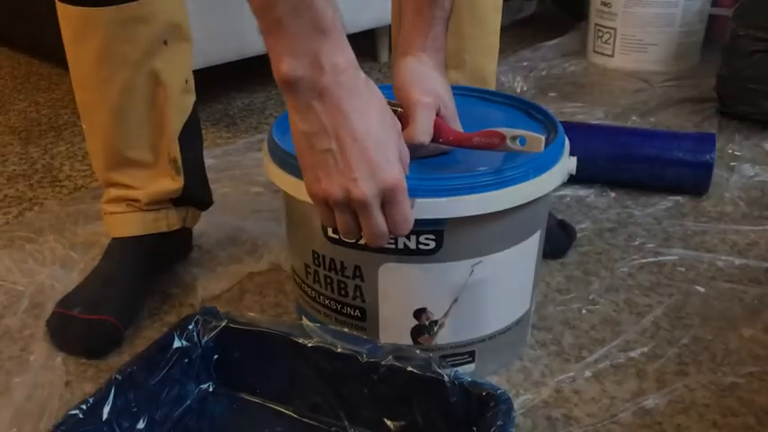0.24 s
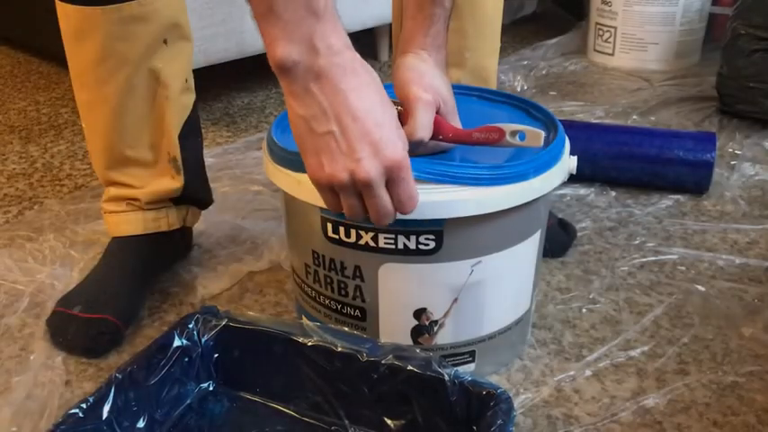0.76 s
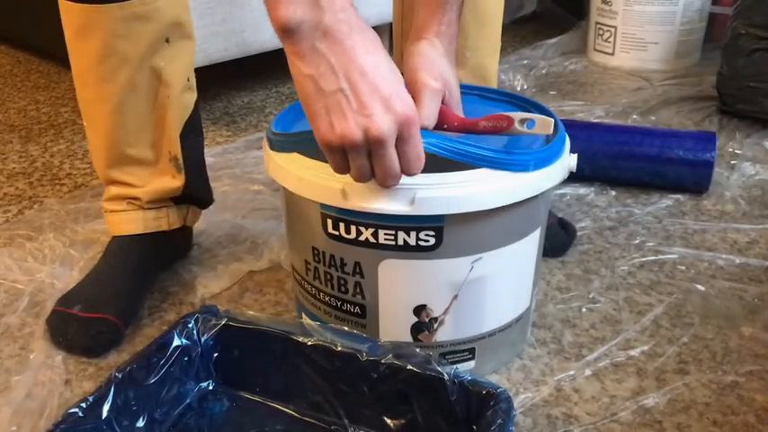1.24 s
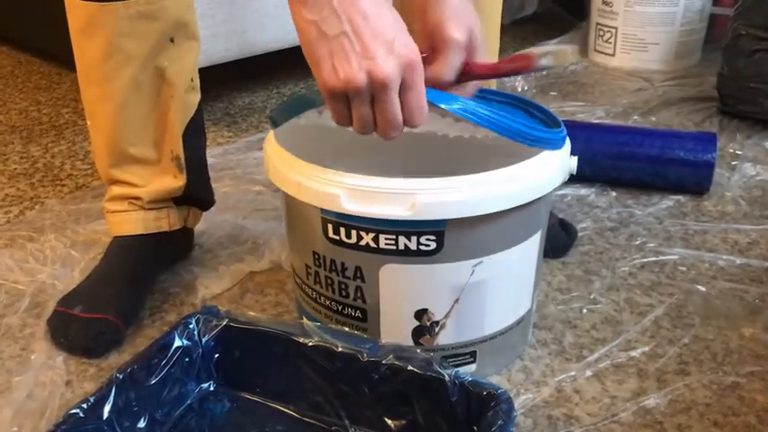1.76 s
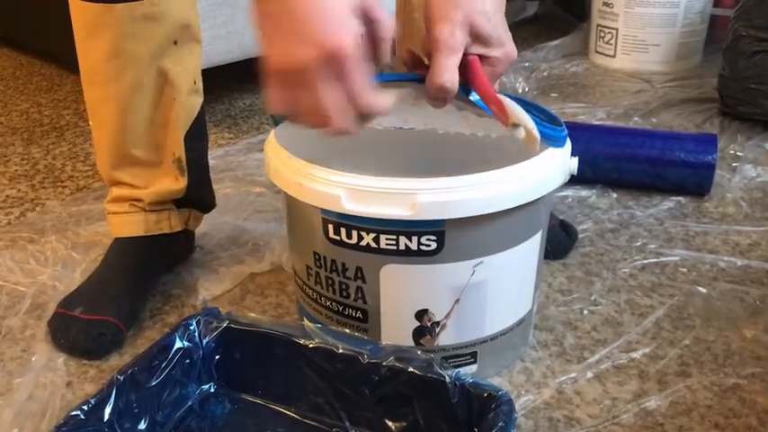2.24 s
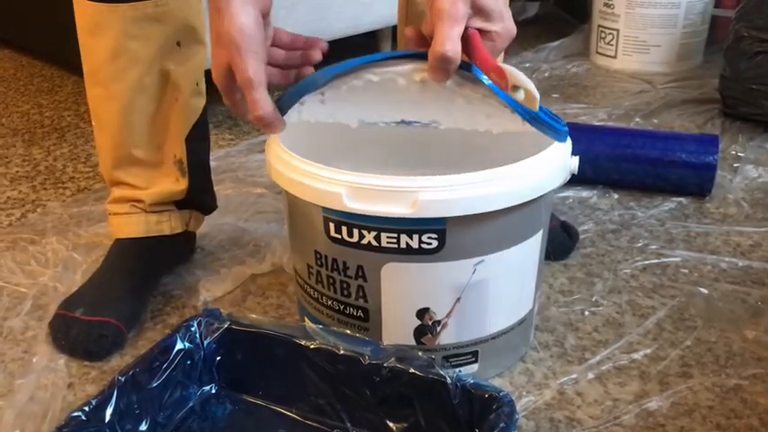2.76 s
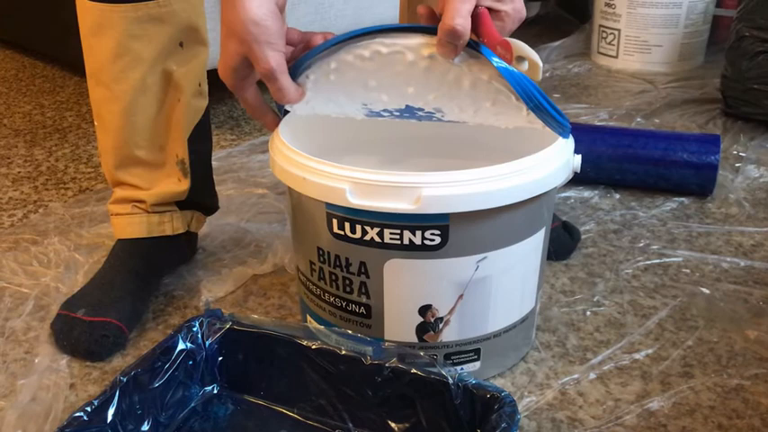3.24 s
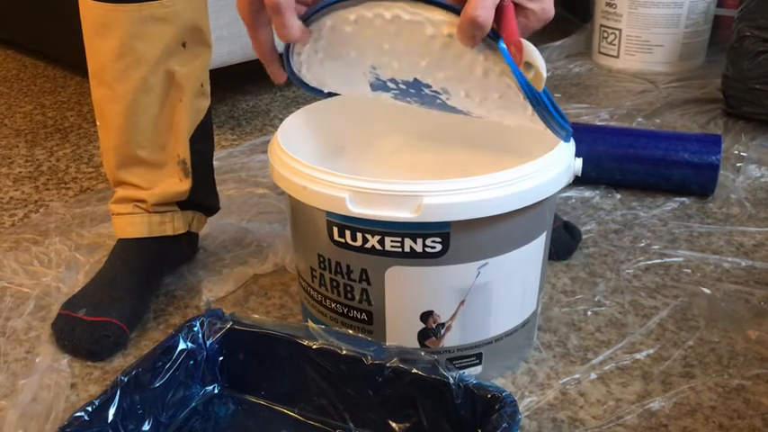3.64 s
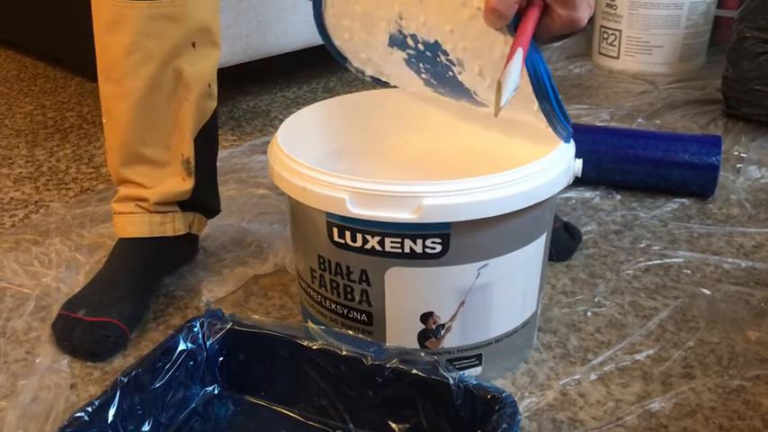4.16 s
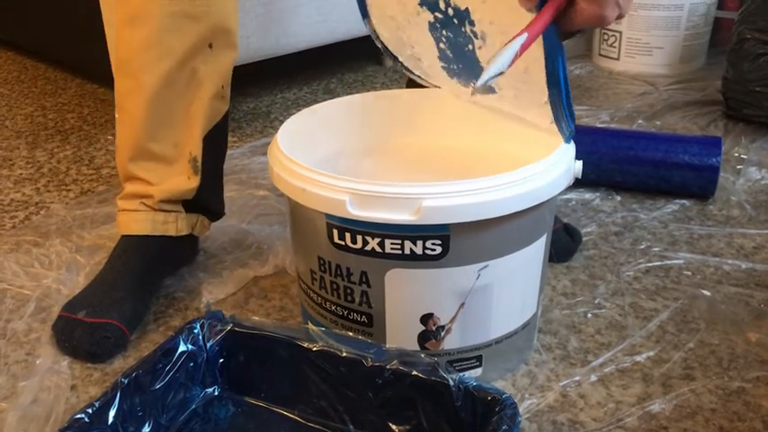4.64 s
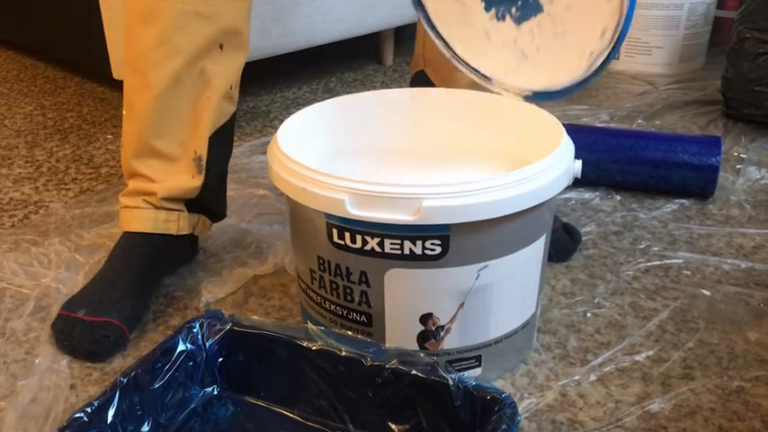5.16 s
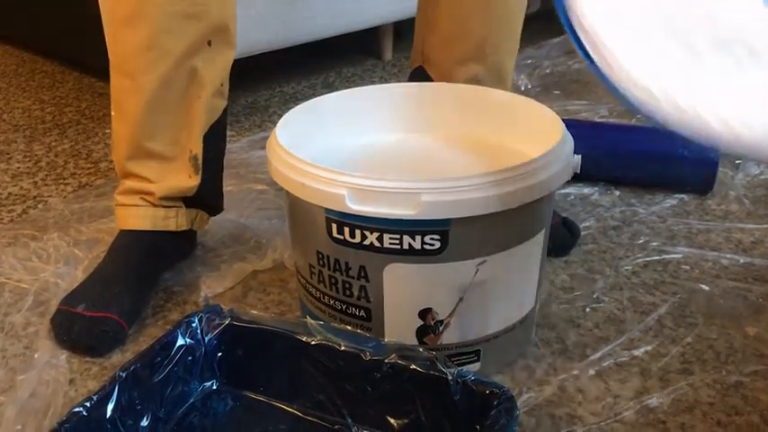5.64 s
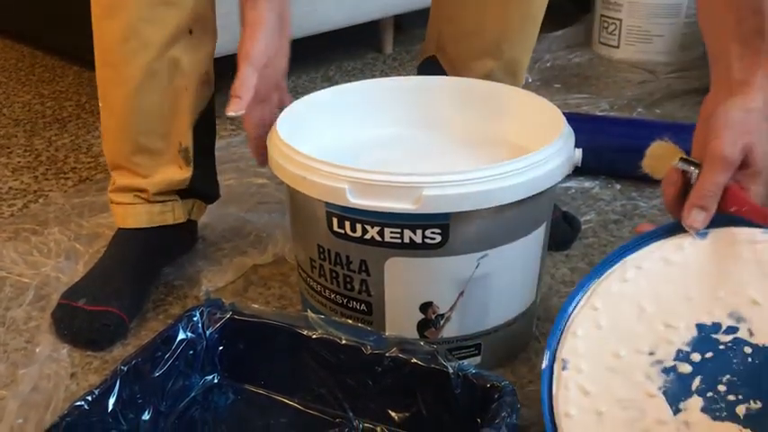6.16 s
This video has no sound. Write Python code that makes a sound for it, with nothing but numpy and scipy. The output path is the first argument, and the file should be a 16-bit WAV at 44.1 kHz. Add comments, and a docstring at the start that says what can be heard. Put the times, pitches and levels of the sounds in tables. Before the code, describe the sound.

A tight plastic lid is pried off a full bucket by hand, cracking loose in sharp hollow snaps with pauses between, in a small room.

```python
"""A small furnished room: the plastic lid of a full paint bucket is pulled off by hand.
Its rim snaps free clip by clip: each snap cracks, flexes the lid panel and rings the bucket modes.
The panel's note follows how the lid is bent; the room answers more as the lid lifts clear.
Shaped noise makes scuffs, rubs, rustling clothes, the lid's ring-outs and the room floor; bumps are
low sines with a dull puff. A fast limiter holds the loudest peaks."""
import sys
import numpy as np
from scipy import signal
from scipy.fft import rfft, irfft, next_fast_len
from scipy.io import wavfile
from scipy.ndimage import uniform_filter1d, minimum_filter1d, map_coordinates

SR = 44100
rng = np.random.default_rng(int(sys.argv[2]) if len(sys.argv) > 2 else 0)


def generate_wav(signal):
    """Clip the signal to [-1, 1] and save it as 16-bit WAV at the path in sys.argv[1]."""
    frames = np.transpose(np.atleast_2d(signal))
    scaled = np.clip(frames, -1, 1) * 32767
    pcm = np.round(scaled).astype(np.int16)
    wavfile.write(sys.argv[1], SR, pcm)


N = 282320


def amp(db):
    """Decibels to gain."""
    return 10 ** (np.asarray(db) / 20)


def unit(x):
    """Scale to rms 1."""
    return x / np.sqrt(np.mean(x ** 2) + 1e-20)


def along(points, hz):
    """(Hz, value) points interpolated on a log frequency axis."""
    f, v = np.transpose(points)
    return np.interp(np.log(hz + 1), np.log(f + 1), v)


def hump(hz, centre_hz, octaves):
    """Bell shape of a well-damped resonance, 1 at its centre."""
    return 1 / (1 + (np.log2((hz + 1) / centre_hz) / octaves) ** 2)


def filtered(x, response):
    """x times a zero-phase response of frequency."""
    m = next_fast_len(len(x) + SR // 10)
    return irfft(rfft(x, m) * response(np.fft.rfftfreq(m, 1 / SR)), m)[:len(x)]


def causal(x, gain_db, size=4096):
    """Minimum-phase colour by folding the cepstrum: nothing sounds before the blow."""
    cepstrum = irfft(np.log(amp(gain_db(np.fft.rfftfreq(size, 1 / SR)))))
    cepstrum[1:size // 2] *= 2
    cepstrum[size // 2 + 1:] = 0
    impulse_response = irfft(np.exp(rfft(cepstrum)))
    return signal.fftconvolve(x, impulse_response)[:len(x)]


def noise(spectrum):
    """Steady coloured noise of rms 1."""
    return unit(filtered(rng.standard_normal(N), lambda hz: amp(along(spectrum, hz))))


def wobble(rate_hz):
    """Random curve of straight segments, rate_hz knots a second."""
    return map_coordinates(rng.standard_normal(N), [np.arange(N) * rate_hz / SR], order=1)


def fade(t, t60):
    """Exponential decay, 60 dB down after t60."""
    return np.exp(-np.log(1000) * t / t60)


def diffuse(decays, t, rise_s):
    """Dense response of energy 1 in which each frequency dies at its own speed."""
    hz, s, z = signal.stft(rng.standard_normal(len(t)), SR, nperseg=128)
    decaying = z * fade(s, along(decays, hz)[:, None])
    tail = signal.istft(decaying, SR, nperseg=128)[1][:len(t)]
    tail = tail * (1 - np.exp(-t / rise_s))
    return tail / np.linalg.norm(tail)


def mode(t, hz, db, t60):
    """Damped sine whose spectral peak stands db above a unit impulse."""
    ring = fade(t, t60)
    return amp(db) * 2 / ring.sum() * ring * np.sin(2 * np.pi * hz * t)


def add(track, s, sound):
    """Mix a sound in at time s."""
    start = round(s * SR)
    track[start:start + len(sound)] += sound[:N - start]


def room(sound, wet_db):
    """Answer of the walls: a dense tail that decays by frequency."""
    # reverberation: f/Hz, t60/s
    wall_decays = [(80, 0.39), (250, 0.62), (600, 0.48), (1500, 0.37), (4000, 0.33), (8000, 0.22),
                   (15000, 0.3)]
    t = np.arange(len(sound)) / SR
    return amp(wet_db) * signal.fftconvolve(sound, diffuse(wall_decays, t, rise_s=0.0035))[:len(t)]


def in_room(sound, wet_db):
    """The sound together with the answer of the walls."""
    return sound + room(sound, wet_db)


def still_room():
    """Steady coloured noise of the still room."""
    # noise colour: f/Hz, relative level/dB
    floor_colour = [(15, -47.5), (25, -15.5), (64, -1), (108, -7), (166, -15.5), (200, -11), (326, -20.5),
                    (384, -19), (714, -25), (3520, -29.5), (5880, -33.5), (14400, -36), (16000, -44.5)]
    return amp(-64.5) * noise(floor_colour)


def swells(gestures):
    """Each gesture speeds up and slows down in a bell curve, length taken between its 1/e points."""
    t = np.arange(N) / SR
    return sum(amp(db) * np.exp(-(2 * (t - s) / length) ** 2) for s, length, db in gestures)


def handling():
    """Hands rub the hollow lid while clothes rustle in uneven spurts, dotted with ticks."""
    # hands shift their grip on the lid: peak t/s, length/s, level/dB
    grip_moves = [(.88, 0.085, -62.5), (1.06, 0.17, -67), (2.04, 0.22, -62.5), (2.27, 0.18, -58.5),
                  (2.66, 0.058, -59.5), (2.9, 0.1, -58), (3.04, 0.072, -62.5)]
    # the body turns to lay the lid aside: peak t/s, length/s, level/dB
    body_turns = [(5.92, 0.6, -67), (6.27, 0.1, -57.5), (6.4, 0.13, -59)]
    # colour of hands on the hollow lid: f/Hz, relative level/dB
    rub_colour = [(60, -8), (120, 5.5), (220, -7), (350, 9.5), (500, -16.5), (1000, -11.5), (3000, -40),
                  (8000, -37)]
    # colour of rustling cloth: f/Hz, relative level/dB
    cloth_colour = [(300, -3.5), (1200, 2.5), (3500, -2), (7000, -6), (10000, -9.5), (15000, -6)]
    sleeve_db = -8  # sleeves rustle with every rub
    specks_per_s, speck_db = 25, 16.98  # fibres catch and tick, above the cloth rustle

    grip = swells(grip_moves)
    rub = grip * amp(2.5 * wobble(30))
    cloth = (amp(sleeve_db) * grip + swells(body_turns)) * amp(2 * wobble(30) + 3 * wobble(400))
    hits = rng.random(N) < specks_per_s / SR
    specks = np.diff(hits * rng.standard_normal(N), prepend=0)
    return rub * noise(rub_colour) + cloth * (noise(cloth_colour) + amp(speck_db) * specks)


def scuffs():
    """Short slides: grainy band-passed friction that swells and breaks off."""
    # fingers, soles and the lid's edge sliding on plastic: peak t/s, level/dB, centre f/Hz, t60/s
    slides = [(0.485, -34.5, 4150, 0.055), (2.11, -55, 1260, 0.072), (3.353, -57.5, 8160, .02),
              (3.433, -49.5, 907, 0.062), (5.094, -39.5, 3030, 0.022), (5.61, -45, 1376, 0.069),
              (5.632, -47.5, 1980, 0.026), (6.143, -48, 7530, 0.0063), (6.227, -43, 4600, 0.039),
              (6.317, -45.5, 1860, 0.054)]
    rise_share = 0.11  # rise time constant / t60: a longer slide swells more slowly
    lead_s, q = 0.05, 1.6
    track, t = np.zeros(N), np.arange(SR // 2) / SR
    for s, db, hz, t60 in slides:
        grain_db = 6.2 * unit(uniform_filter1d(rng.standard_normal(len(t)), size=50))
        grains = rng.standard_normal(len(t)) * amp(grain_db)
        grains = unit(filtered(grains, lambda f: f * hz / np.hypot(f * hz, q * (f * f - hz * hz))))
        rise = np.exp(np.minimum(t - lead_s, 0) / (rise_share * t60))
        swell = rise * fade(np.maximum(t - lead_s, 0), t60)
        add(track, s - lead_s, in_room(amp(db) * grains * swell, wet_db=-9.5))
    return track


def bumps():
    """Soft contacts of hands and feet: a short low note with a dull puff."""
    # contacts: t/s, level/dB, f/Hz
    contacts = [(.488, -25, 253), (1.334, -47.5, 325.6), (1.491, -22, 240), (2.114, -44, 264),
                (2.513, -46, 265.8), (3.039, -47, 228.8), (3.171, -47, 191.7), (5.098, -29, 46.24),
                (5.874, -52, 328.6), (6.227, -32.5, 105.6)]
    # a low bump swells and dies more slowly: t60 and rise time constant in cycles
    t60_cycles, rise_cycles, puff_share = 7.3, 0.32, 0.2
    track, t = np.zeros(N), np.arange(SR // 2) / SR
    for s, db, hz in contacts:
        puff = unit(filtered(rng.standard_normal(len(t)), lambda f: 1 / (1 + (f / hz) ** 4)))
        swell = fade(t, t60_cycles / hz) * (1 - np.exp(-t * hz / rise_cycles))
        note = np.sin(2 * np.pi * hz * t)
        add(track, s, in_room(amp(db) * (note + puff_share * puff) * swell, wet_db=-8))
    return track


def ring_outs():
    """Narrow noise bands: close modes beat as the flexed lid comes to rest after big releases."""
    # ringing lid: t/s, f/Hz, level/dB, t60/s
    lid_rings = [(1.117, 3150, -33, .2), (1.585, 328, -24.5, 0.52), (1.585, 850, -32.5, 0.38),
                 (3.456, 900, -21, 0.23), (3.456, 430, -31, 0.51), (3.698, 434, -33, 0.43),
                 (3.77, 430, -30.5, 0.42), (4.827, 980, -22, 0.18), (5.098, 540, -35.5, 0.51),
                 (5.098, 1000, -26, 0.38), (5.099, 1470, -27, 0.35)]
    half_width, rise_s = 0.073, 0.0028  # half_width as a share of the pitch
    track, t = np.zeros(N), np.arange(SR) / SR
    for s, hz, db, t60 in lid_rings:
        band = lambda f: 1 / (1 + ((f / hz - 1) / half_width) ** 4)
        cluster = unit(filtered(rng.standard_normal(len(t)), band))
        add(track, s, amp(db) * cluster * fade(t, t60) * (1 - np.exp(-t / rise_s)))
    return track


def bucket_ring(t, cushion_db):
    """Damped modes of the bucket; the air cushion shifts the level of the lowest."""
    # bucket wall and air under the lid: f/Hz, relative level/dB, t60/s
    bucket_modes = [(92.6, 9.5, 0.4), (161, 9, 0.41), (199.3, 6.5, 0.43), (285.2, 2.5, 0.28),
                    (356, -5, 0.31), (451.3, 9, 0.38), (573, 3.5, 0.22), (847, 4, 0.22), (972, -2, 0.22),
                    (1100, 2, 0.45), (1428, 4, 0.22), (1562, 1.5, .2), (1753, 0, 0.062), (2680, 0.5, 0.15)]
    ring = np.zeros(len(t))
    for k, (hz, db, t60) in enumerate(bucket_modes):
        level_db = db + cushion_db if k == 0 else db
        ring += (-1) ** k * mode(t, hz, level_db, t60)
    return ring


def release(t, strength_db):
    """A clip lets go: a sharp crack trailed by tiny slips, plus one push as the wall springs back."""
    # a faint slip drags, a hard snap is over at once:
    # strength/dB, crack t60/s, sharp tick level against the burst/dB
    contact = [(2, 0.014, -12.5), (18, 0.0059, -2.5)]
    slips_db, slips_t60_s = -13, 0.012
    split_hz = 1300  # below it the wall moves as one
    levels, t60s, ticks = np.transpose(contact)
    crack_t60 = np.interp(strength_db, levels, t60s)
    tick_db = np.interp(strength_db, levels, ticks)

    envelope = fade(t, crack_t60) + amp(slips_db) * fade(t, slips_t60_s)
    burst = rng.standard_normal(len(t)) * envelope
    burst = burst / np.linalg.norm(burst)
    burst = burst + amp(tick_db) * signal.unit_impulse(len(t), round(0.0008 * SR))
    burst = burst / np.linalg.norm(burst)
    spring_back = signal.unit_impulse(len(t), round(0.0012 * SR))
    low = signal.butter(2, split_hz, 'low', fs=SR, output='sos')
    high = signal.butter(2, split_hz, 'high', fs=SR, output='sos')
    return signal.sosfilt(low, spring_back) + signal.sosfilt(high, burst)


def snaps():
    """Each release rings bucket, rim and lid panel; flex shifts the bass, dullness tilts the treble."""
    # rim clips: t/s, strength/dB, wall flex/dB, dullness/(dB/octave), rim note f/Hz
    clips = [(0.487, 6, 0, 9, 900), (0.5439, 7.5, -7.5, 16.5, 790), (1.1164, 13, 3.5, 15.5, 2600),
             (1.516, 1, -3, 18.5, 810), (1.558, 20, 11, 10, 850), (1.5825, 17, 13.5, 11, 1770),
             (1.604, 9, 13, 12, 840), (3.4542, 20, 12.5, 8.5, 880), (3.498, 6, 18.5, 10.5, 910),
             (3.5081, 11, 11.5, 18, 885), (3.525, 4.5, 9.5, 15.5, 790), (3.561, 8.5, -9, 11.5, 1390),
             (3.69, 3.5, 21, 8.5, 854), (3.6962, 14, 4.5, 16, 2300), (3.7645, 13.5, 3.5, 14.5, 850),
             (3.789, 8.5, 7.5, 16.5, 736), (3.867, -4.5, 17.5, 9, 1370), (3.8927, 5, 14, 12.5, 1480),
             (3.979, -0.5, 12.5, 16, 730), (4.008, 8.5, 9, 11, 1950), (4.1217, 1, 15.5, 13, 1520),
             (4.149, -2, 5, 26, 920), (4.269, 3.5, 7, 19.5, 1020), (4.338, 11, 6.5, 12.5, 1880),
             (4.35, 7.5, 8.5, 14, 1100), (4.378, 5, 4.5, 15.5, 870), (4.771, -4, 2, 9.5, 1085),
             (4.8254, 17.5, 2, 10, 958), (5.043, 4, -2, 19.5, 1060), (5.07, 1, -2.5, 17.5, 2400),
             (5.0973, 23.5, 2, 7, 1330), (5.201, 0, -7, 10, 1413)]
    # peeling: tight, front edge lifts, bent far back, side gives way, far edge holds, last clips, free
    # from t/s, panel note f/Hz, panel width/octaves, panel level/dB, rim level/dB, bucket/dB, room/dB
    stages = [(0, 247, .32, 19, 5, 0, -11.5), (1, 301, .34, 10, 11, -0.5, -12),
              (3, 403, .2, 10.5, 11.5, -1, -12), (3.83, 188, .31, 4, 9, -2, -11.5),
              (4.345, 549, .44, 11.5, 5.5, -1.5, -11.5), (4.7, 612, 0.56, 19, 10.5, -7, -9),
              (5, 372, .47, 5, 14, 0.5, -8)]
    # colour shared by all snaps: f/Hz, level/dB
    plastic = [(6, -56), (30, -20.5), (60, -11), (110, -6.5), (300, -4.5), (620, -5.5), (1000, -4),
               (1250, -8), (1600, -3.5), (2300, -3.5), (3700, 1), (4900, -1), (6000, -0.5), (8500, -1.5),
               (11000, -4), (16000, -6)]
    # dense modes of the plastic: f/Hz, t60/s
    shell_decays = [(100, .09), (500, 0.14), (2000, 0.06), (6000, 0.048), (15000, 0.053)]
    # air cushion under the lid, the bucket's lowest mode, fades as the lid opens: t/s, level/dB
    cushion = [(1.5, 1.5), (3.5, -2), (4.8, -8.5)]
    flex_hz, flex_order = 463, 4.2  # flex acts below this corner
    dull_hz, dull_end_hz = 2760, 15700  # dullness acts between these corners
    shudder_db = -3  # shell ringing against the strike
    rim_octaves = 0.18
    rim_room_share = 0.73  # the rim's note beams forward: share of its dB that reaches the walls

    track, t = np.zeros(N), np.arange(SR * 3 // 4) / SR
    for s, strength_db, flex_db, dullness_db, rim_hz in clips:
        stage = stages[sum(s >= later[0] for later in stages[1:])]
        _, panel_hz, panel_octaves, panel_db, rim_db, bucket_db, wet_db = stage

        bucket = bucket_ring(t, np.interp(s, *np.transpose(cushion)))
        shell = amp(shudder_db) * diffuse(shell_decays, t, rise_s=0.0011)
        strike = release(t, strength_db)
        blow = amp(strength_db) * (strike + shell + amp(bucket_db) * bucket)

        octaves_up = lambda hz: np.log2(np.hypot(1, hz / dull_hz) / np.hypot(1, hz / dull_end_hz))
        flex = lambda hz: flex_db / (1 + (hz / flex_hz) ** flex_order)
        force = lambda hz: flex(hz) - dullness_db * octaves_up(hz)
        panel = lambda hz: panel_db * hump(hz, panel_hz, panel_octaves)
        colour = lambda hz: force(hz) + panel(hz) + along(plastic, hz)
        rim = lambda hz: rim_db * hump(hz, rim_hz, rim_octaves)

        direct = causal(blow, lambda hz: colour(hz) + rim(hz))
        outward = causal(blow, lambda hz: colour(hz) + rim_room_share * rim(hz))
        add(track, s, direct + room(outward, wet_db))
    return track


def scene():
    """All layers summed to one channel."""
    background = still_room() + handling()
    contacts = scuffs() + bumps()
    return (background + contacts + ring_outs() + snaps())[None]


def record(dry):
    """A fast look-ahead limiter holds the peaks; a steep low-pass sets the band limit."""
    ceiling, top_hz = 0.69, 16100
    needed = ceiling / np.maximum(np.abs(dry[0]), ceiling)
    gain = uniform_filter1d(minimum_filter1d(needed, size=51), size=41)
    return filtered(dry[0] * gain, lambda hz: 1 / np.hypot(1, (hz / top_hz) ** 90))[None]


dry = scene()
out = record(dry)
generate_wav(out)
```